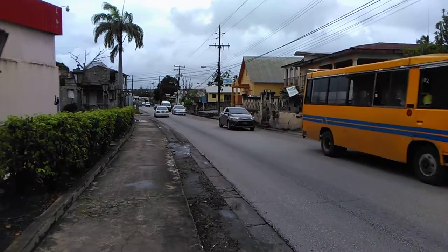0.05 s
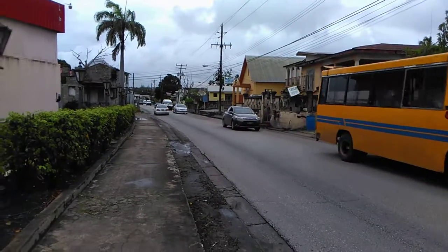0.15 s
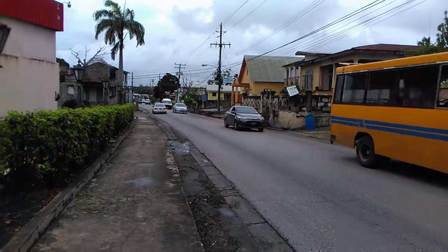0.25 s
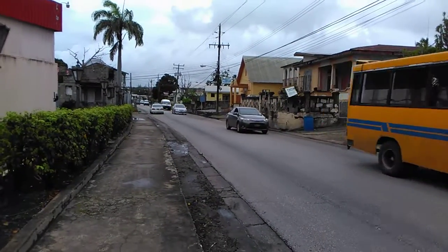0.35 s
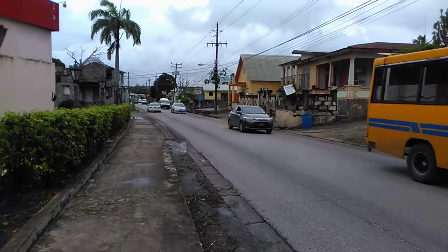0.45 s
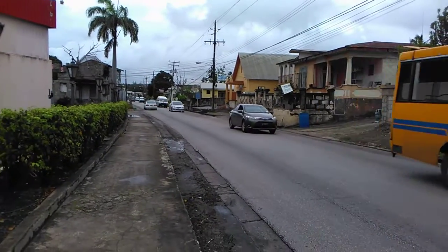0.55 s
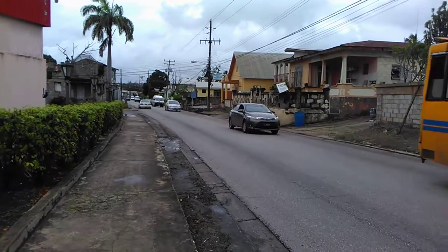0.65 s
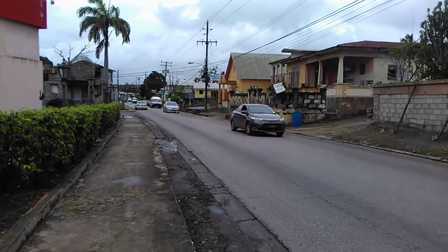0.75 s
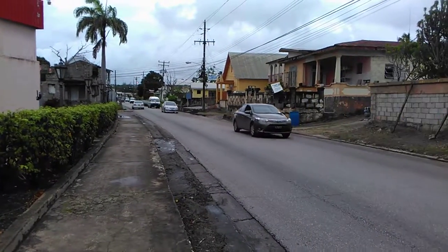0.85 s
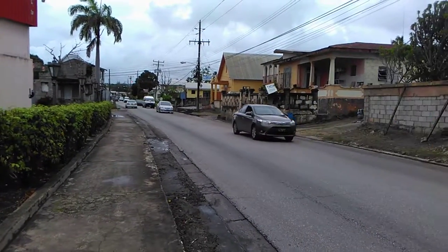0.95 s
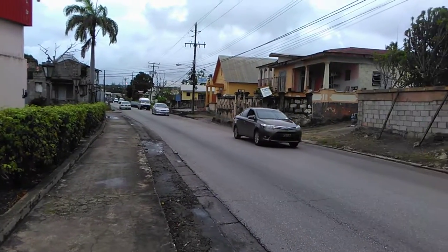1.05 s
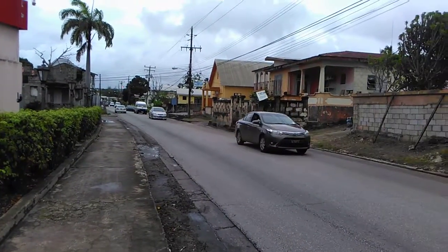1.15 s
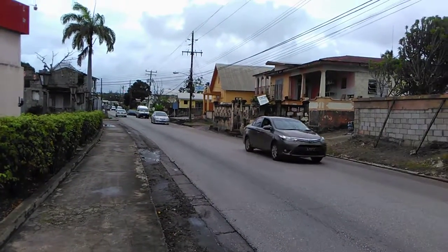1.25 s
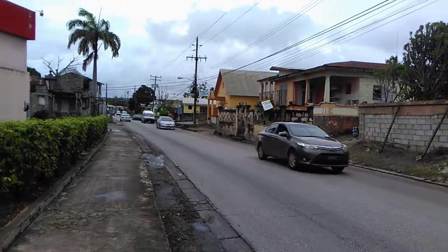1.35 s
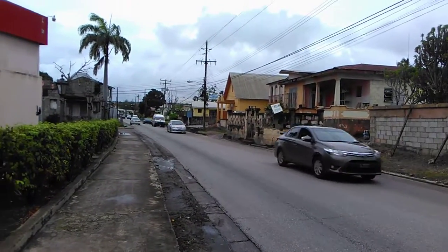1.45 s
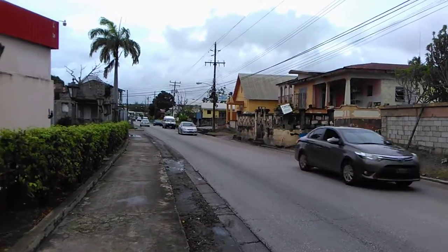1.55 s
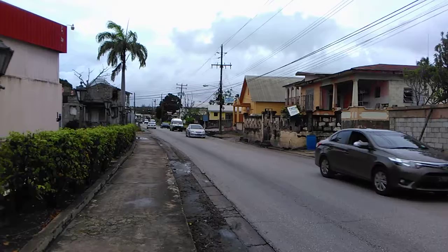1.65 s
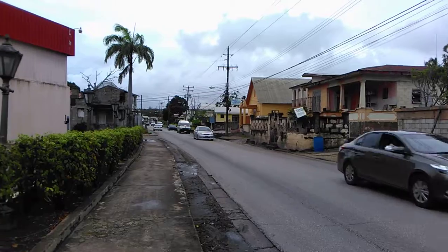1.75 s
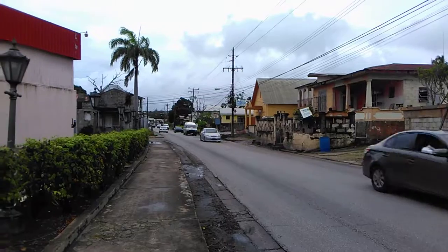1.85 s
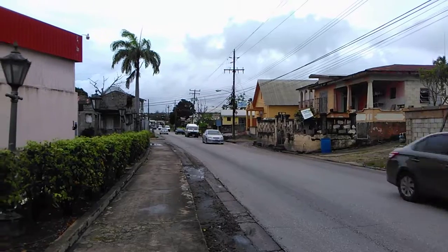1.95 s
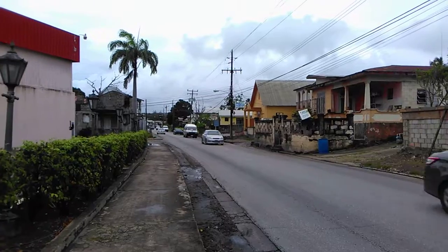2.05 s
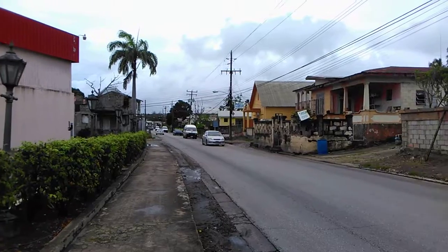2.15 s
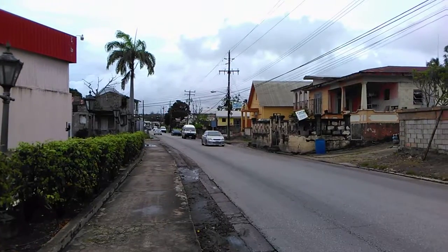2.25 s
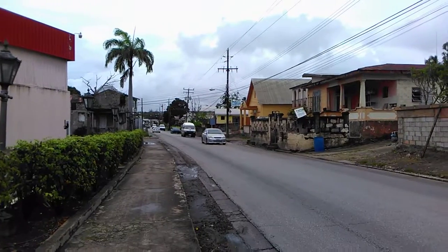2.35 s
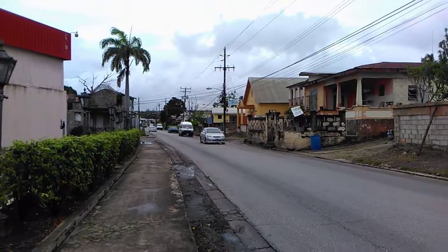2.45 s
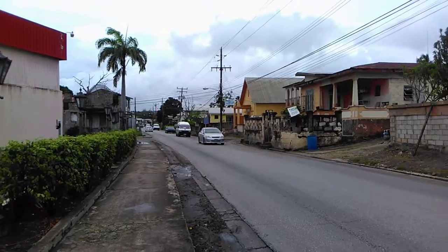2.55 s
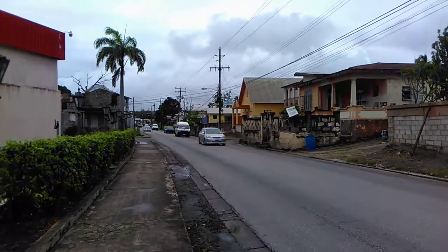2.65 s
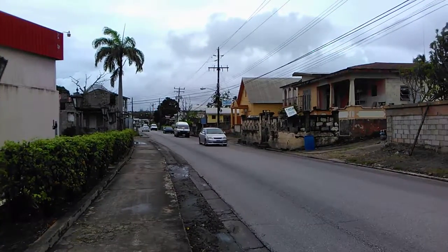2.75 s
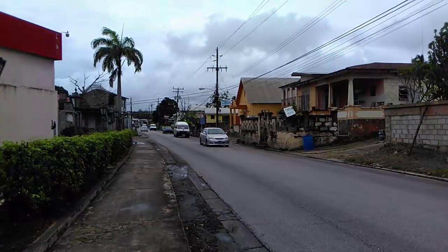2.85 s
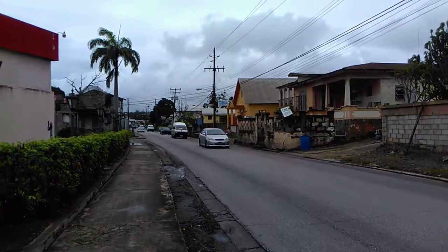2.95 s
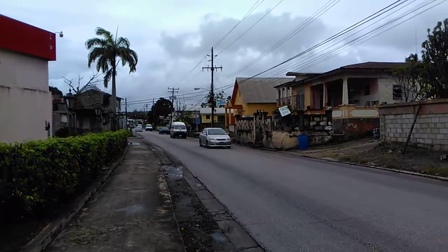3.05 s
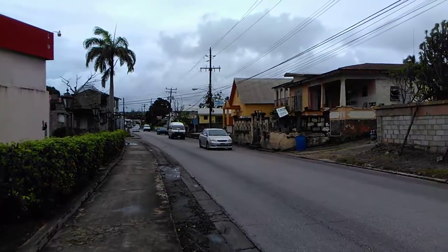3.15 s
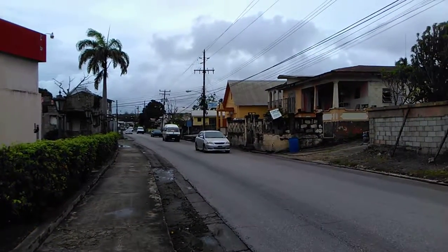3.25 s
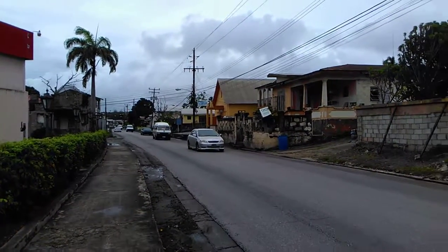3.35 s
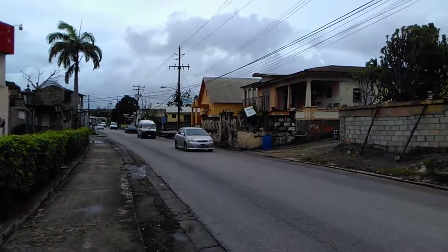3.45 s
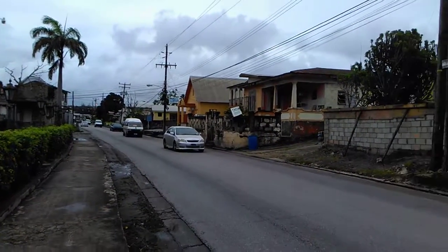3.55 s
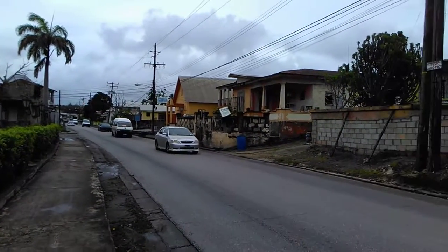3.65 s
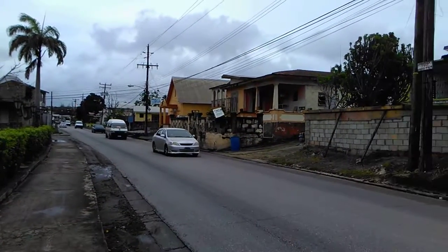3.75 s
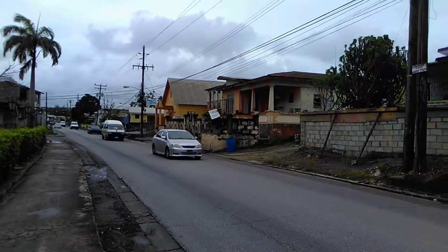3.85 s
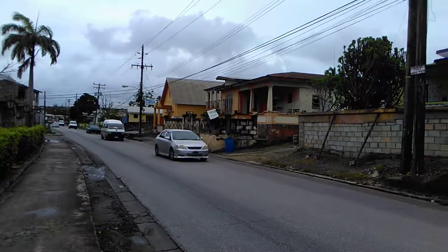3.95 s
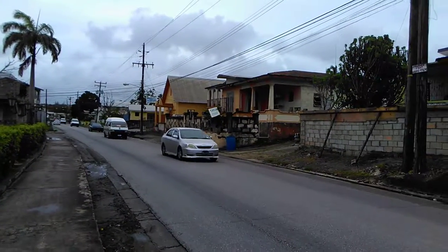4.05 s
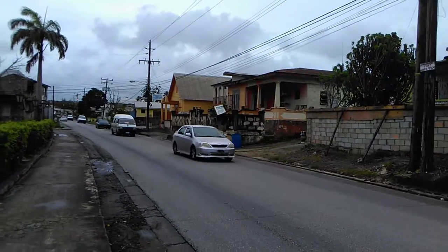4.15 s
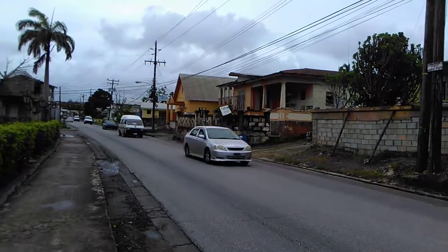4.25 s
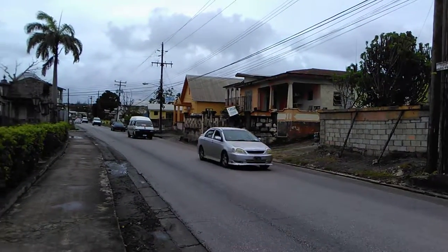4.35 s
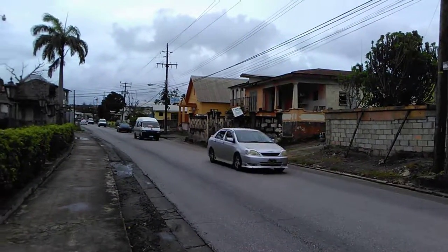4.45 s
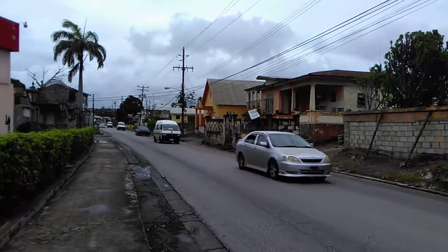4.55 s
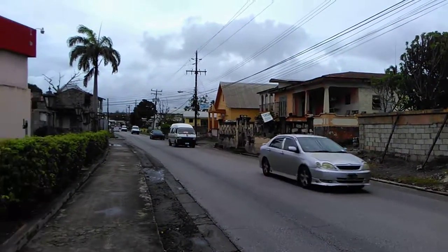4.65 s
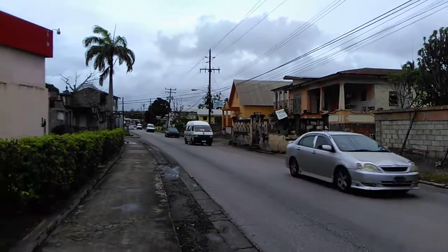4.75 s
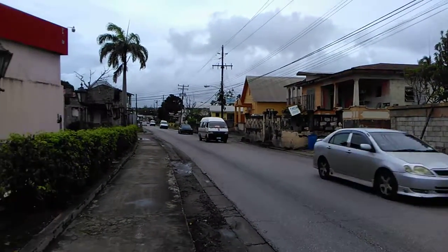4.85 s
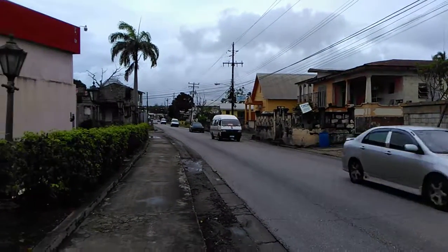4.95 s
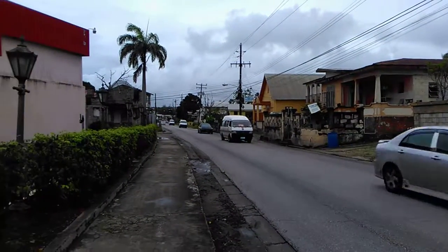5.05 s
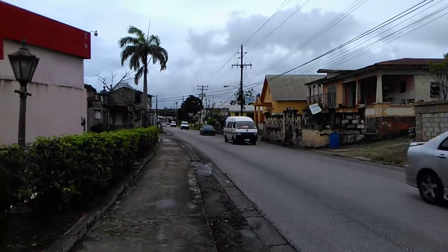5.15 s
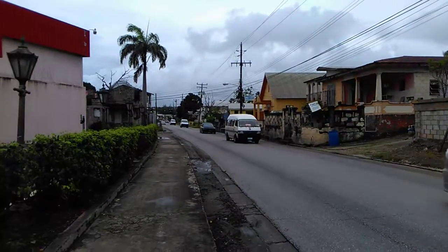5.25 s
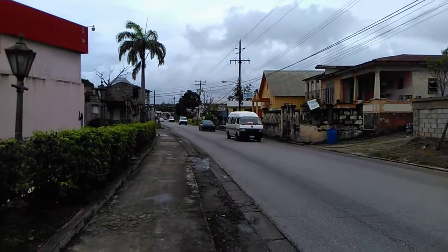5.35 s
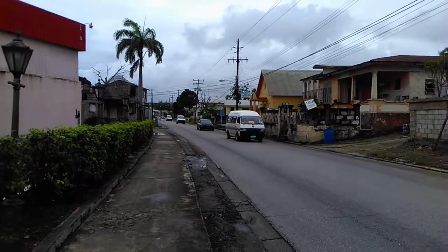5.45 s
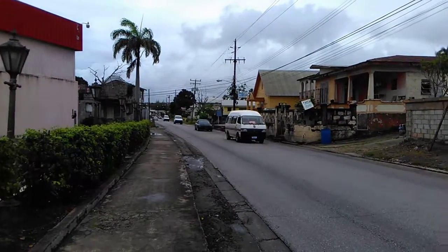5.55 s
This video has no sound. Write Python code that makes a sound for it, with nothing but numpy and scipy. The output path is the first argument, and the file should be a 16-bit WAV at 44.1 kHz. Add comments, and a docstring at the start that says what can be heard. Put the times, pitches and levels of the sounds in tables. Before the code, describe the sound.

Street traffic: a deep, raspy bus exhaust fades into the tyre roar of passing cars before another loud engine booms nearby.

```python
"""Traffic on a residential street, close to a small camera. A diesel bus pulls away with a booming exhaust,
hiss and clatter; tyre roar of cars fills the gap; then a second loud exhaust bursts in close by.
The camera's limiter holds the peaks and its electronics leak a faint high whine."""
import sys
import numpy as np
from scipy import signal
from scipy.io import wavfile
from scipy.ndimage import uniform_filter1d, minimum_filter1d

SR = 44100
rng = np.random.default_rng(int(sys.argv[2]) if len(sys.argv) > 2 else 0)


def generate_wav(signal):
    """Clip the signal to [-1, 1] and save it as 16-bit WAV at the path in sys.argv[1]."""
    frames = np.transpose(np.atleast_2d(signal))
    scaled = np.clip(frames, -1, 1) * 32767
    pcm = np.round(scaled).astype(np.int16)
    wavfile.write(sys.argv[1], SR, pcm)


N = 247842

# exhaust boom, one curve an engine: (s, firing rate Hz, dB of orders 1 to 3)
BUS = [(0, 61.7, -5, -7.5, -15), (.15, 65.06, -7.5, -13.5, -17.5), (.34, 68.03, -7.5, -20, -18.5), (.55, 66.9, -4.5, -19, -25),
       (.68, 67.77, -3.5, -14, -37.5), (.87, 67.72, -6, -14, -28.5), (1.26, 68.22, -8, -21, -51.5), (1.48, 67.23, -12, -19.5, -37),
       (1.53, 66.4, -15.5, -19.5, -39), (1.74, 66, -20, -23, -40), (1.81, 65.5, -42, -35, -48), (1.93, 65.57, -20.5, -32.5, -51),
       (2.09, 64.28, -40.5, -37, -46), (2.8, 63.66, -37, -35, -40.5), (3.2, 63.2, -43.5, -46, -42), (3.33, 63, -29, -29.5, -57), (3.5, 62, -41, -56, -50)]
SECOND = [(4.05, 61.94, -48.5, -35, -39), (4.16, 60.97, -34, -41, -47), (4.205, 61.13, -25, -30, -38), (4.23, 61.74, -8.5, -18, -28),
          (4.3, 61.2, -7.5, -20, -20.5), (4.43, 60.06, -7, -23, -26), (4.53, 62.91, -7, -13, -19.5), (4.6, 65.53, -5, -19, -16.5), (4.72, 61.01, -2.5, -17, -24), (4.82, 61.42, -7, -15, -21), (4.9, 61.02, -9.5, -9.5, -26.5),
          (5.08, 61.88, -8, -10, -21), (5.19, 62.9, -7, -16.5, -33.5), (5.38, 63.65, -4.5, -21.5, -26), (5.53, 64.1, -8, -13.5, -20),
          (5.62, 63.76, -7.5, -14, -38)]
# rasp between the bursts, one row an engine: (dB against order 1, pipe resonance Hz, order 4 against the rasp dB)
RASP = [(-21.5, 368, -4), (-28.5, 480, 0)]
# swells of tyre roar as vehicles come and go: (loudest s, spread s, dB near 1.3 kHz, body lift dB, treble lift dB,
# tread resonance Hz, its height dB)
ROAD = [(.27, 0.15, -29.5, 2, -4, 900, 2.5), (.62, 0.31, -38, -10.5, 7.5, 860, 7.5), (1.15, 0.23, -47.5, -4.5, 2, 860, 17),
        (1.7, 0.34, -38, 0, 1.5, 992, -1.5), (2.5, 0.54, -35, 2, 3, 1060, 5.5), (2.9, 0.084, -44, 14, -2.5, 1080, 9),
        (3.251, 0.31, -39, -2.5, -3, 1055, -0.5), (3.55, 0.22, -41.5, 0.5, -1, 800, 0.5), (3.8, 0.13, -34.5, -6, 1, 916, 17),
        (4.1, 0.25, -39.5, -3.5, 1.5, 900, 6.5), (4.42, 0.22, -42, -0.5, 1.5, 880, 5.5),
        (4.75, .2, -44, 12, 2, 699, 8.5), (5.1, 0.21, -43.5, -5.5, 0.5, 700, 13.5), (5.62, 0.3, -34.5, 0, 2.5, 667, 1.5)]
TYRES = [(88, -47.5), (150, 3), (192, -7.5), (309, -15.5), (363, -3), (428, -8.5), (748, -6.5), (881, -12.5), (1090, -9),
         (1420, -12.5), (1720, -11), (2640, -17), (2960, -19.5), (7540, -42), (9800, -57.5), (16600, -120)]  # (Hz, dB per Hz)
RUMBLE = [(15, -24.5), (30, 9.5), (60, 1.5), (120, 2.5), (220, -5.5), (400, -18), (700, -72.5)]  # (Hz, dB per Hz)
# one table an engine: (s, block clatter dB)
CLATTER = [[(0, -39.5), (.1, -32), (.27, -27.5), (.42, -30), (.61, -36.5), (.63, -44), (.9, -39.5)],
           [(4.4, -54), (4.49, -45), (4.51, -35), (4.55, -41), (4.85, -33), (4.94, -33), (5.08, -29), (5.12, -38), (5.155, -28.5), (5.2, -33), (5.62, -35.5)]]
BLOCKS = [[(2150, 470, -3.5), (2720, 380, -0.5), (3260, 1400, -12.5)],
          [(1350, 160, -1.5), (2065, 170, 0), (2380, 350, -7.5), (2650, 520, -10)]]  # (Hz, width Hz, dB)
# one table an engine: (s, narrow hiss dB, wide hiss dB)
HISS = [[(0, -50, -43), (.256, -39, -35.5), (.86, -41.5, -45), (.9, -41.5, -55), (1.07, -50.5, -65.5), (1.456, -45, -69), (1.65, -64, -63)],
        [(4.85, -62, -68), (4.97, -60, -63), (5.19, -65.5, -71), (5.274, -61.5, -53), (5.62, -73, -47.5)]]
NARROW = [(4750, -43.5), (5050, -4.5), (5700, -4), (6150, -13), (6450, -45), (9200, -37.5), (9600, -26), (14200, -40.5)]  # (Hz, dB per Hz)
# one spectrum an engine: (Hz, dB per Hz)
WIDE = [[(3000, -29.5), (4500, -5), (6500, -1), (8000, -12), (9400, -17), (11000, -38), (14200, -36.5)],
        [(3000, -16.5), (4500, -7), (6000, -4.5), (7200, 0.5), (7700, -6.5), (8200, -24.5), (14200, -37)]]
# bursts of the whine: (s, length s, dB)
WHINE = [(1.012, .17, -65), (4.635, .19, -84), (5.277, .13, -82)]  # further bursts: (s, length s, dB)
WHINE_HZ = 14000
TICKS = [(4.3754, -49), (4.4263, -40), (4.5444, -53), (4.5695, -50), (4.5994, -47), (4.617, -42), (4.8135, -36), (5.1985, -44), (5.2834, -45),
         (5.3878, -40)]  # faint clicks: (s, peak dB)
EDGE_HZ = 14250  # fixed
TIME = np.arange(N) / SR
# one table an engine: (s, share of uneven firings 0-1)
UNEVEN = [[(0, 0.65), (.6, 0.1), (1.15, 0.47), (1.3, 0.97), (1.6, 1.1)], [(4.05, 0.44), (4.7, 0.2), (5.2, 0.1), (5.62, 0.05)]]
PIPES = [[(150, -33), (300, -0.5), (450, -4), (620, -10.5), (900, -23), (1500, -46)],
         [(150, -27), (310, 12.5), (380, -5), (500, 2.5), (700, -4.5), (1000, -8.5), (1300, -46.5)]]  # (Hz, dB)
SELF_NOISE, SELF_DB = [(3000, -28.5), (8000, -5), (11000, -2), (14500, -7)], -71.5  # microphone: (Hz, dB per Hz), dB
LOW = [(0, -17.5), (.27, -26.5), (.45, -28.5), (1.4, -28), (1.58, -30), (2.75, -44), (3.2, -41), (3.33, -37), (3.63, -41), (3.84, -35.5), (4.08, -41),
       (4.23, -23), (5.62, -25.5)]  # low rumble: (s, dB of its lowest octave)
# short knocks from the traffic: (s, peak dB, Hz, t60 s)
KNOCKS = [(2.071, -20.5, 757, 0.082), (2.639, -25, 758, 0.098), (3.26, -18, 119.6, 0.28), (3.331, -21, 109.7, 0.25),
          (3.445, -24, 766, 0.08), (3.83, -13, 45.2, 0.13), (3.9, -22.5, 765, 0.077), (4.085, -18.5, 248, 0.13)]
# the boom dips briefly: (s, half width s, dB of order 1, dB of the orders above)
DIPS = [(4.49, 0.045, -15.5, -3.5), (4.66, .04, -18, 6), (5.6, 0.034, -14, -14)]
# bursts of rasp, one table an engine: (start s, hold s, rise s, fall s, dB, pipe resonance Hz, order 4 against the rasp dB)
BURSTS = [[(.3, 0.062, .25, 0.073, -20, 468, -4.5), (.98, 0.14, .05, .1, -30, 330, 4.5), (1.3, .17, 0.058, 0.042, -18.5, 340, 0.5), (1.6, 0.18, .05, 0.089, -40.5, 447, -5)],
          [(4.33, .01, 0.019, .05, -21.5, 420, -16), (4.553, .13, .006, .015, -16, 594, -0.5), (4.755, .01, .02, .04, -15.5, 520, -16),
           (4.8, .2, 0.035, 0.086, -25, 502, -5.5), (5.35, .02, 0.091, 0.031, -25.5, 580, -2), (5.52, 0.074, 0.1, .01, -19.5, 490, -7)]]
# the whine blips at a steady pace, every sixth blip is long
BLIP_EVERY_S, BLIP_S, BLIP_DB, LONG_S, LONG_DB = .3202, .02, -75, .14, -68
FALL_DB = 10  # a burst of rasp loses this much in each rise or fall time


def amp(db):
    """dB to gain."""
    return 10 ** (np.asarray(db) / 20)


def evened(x):
    """Scales to rms 1."""
    return x / np.sqrt(np.mean(np.abs(x) ** 2) + 1e-20)


def read(points, hz):
    """Spectrum value on a log-frequency axis."""
    f, value = np.transpose(points)
    return np.interp(np.log(hz + 1), np.log(f + 1), value)


def columns(rows, t=TIME):
    """Each column of a curve at times t, and a gate that is open while the curve lasts."""
    s, *cols = np.transpose(rows)
    gate = np.clip(np.minimum(t - s[0] + 1e3 * (s[0] < .01), s[-1] - t + 1e3 * (s[-1] > 5.6)) / .05, 0, 1)  # fixed
    return gate, [np.interp(t, s, c) for c in cols]


def drift(rate):
    """Slow chance of rms 1, changing about rate times a second."""
    steps = rng.standard_normal(1200)
    return np.interp(TIME * np.clip(rate, 1, 200), np.arange(1200), steps) * np.sqrt(3 / 2)


def noise(field_db, patchy_db, flicker_db, size, band=(0, SR)):
    """Random short-time spectra; field_db(hz, t) gives the colour, with patches and wide flicker on top.
    The part inside band has rms 1."""
    hop = size // 4
    frames, hz = N // hop + 5, np.fft.rfftfreq(size, 1 / SR)[:, None]
    a, b, patches = rng.standard_normal((frames, len(hz), 3), dtype=np.float32).T
    flicker = evened(uniform_filter1d(uniform_filter1d(patches[::-1], size // 8, 0), 3, 1))
    patches = evened(uniform_filter1d(uniform_filter1d(patches, size // 100, 0), 3000 // hop, 1))
    colour = amp(field_db(hz, np.arange(frames) * hop / SR))
    colour = colour / np.sqrt((colour ** 2 * (hz >= band[0]) * (hz < band[1])).mean(0))
    z = (a + 1j * b) * colour * amp(patchy_db * patches + flicker_db * flicker)
    return np.sqrt(np.mean(colour ** 2)) * evened(signal.istft(z, nperseg=size, noverlap=size - hop)[1][:N])


def exhaust(rows, steady, bursts, uneven_rows, pipe, wobble_db, rough, jitter):
    """Firing orders as wavering sines; above them a rasp whose half orders come from uneven cylinders."""
    gate, hz, first_db, upper_db = boom_of(rows, TIME)
    rasp_db, pipe_hz, fourth_db = rasp_of(rows, steady, bursts, TIME)
    order_db = [first_db, *upper_db, rasp_db + fourth_db]
    uneven = np.clip(columns(uneven_rows)[1][0], 0, 1)
    turns = np.cumsum(hz * (1 + jitter * drift(30))) / SR
    slide = [0.68 * k * drift(1.98) for k in range(4)]  # echoes slowly shift the upper orders against the first
    far = 0.1 * np.clip(-27 - order_db[0], 0, 20)  # a faint, far engine wavers more
    boom = sum(np.sqrt(2) * amp(db + wobble_db * (1 + 0.43 * k + far) * drift(25)) * np.sin(2 * np.pi * (k + 1) * turns + slide[k])
               for k, db in enumerate(order_db))

    def colour(f, centre_hz):
        return read(pipe, f) + 18.4 * np.exp(-(np.log((f + 1) / centre_hz) / 0.63) ** 2)
    lines, power = 0, 0
    for half in range(9, 36):
        height = (uneven if half % 2 else 1) * amp(colour(half / 2 * hz[::64], pipe_hz[::64])).repeat(64)[:N]
        lines = lines + height * amp(3.3 * drift(12)) * np.cos(2 * np.pi * (half / 2 * turns + 0.21 * rng.standard_normal()))  # nearly in step: one pulse a firing
        power = power + height ** 2
    gas = noise(lambda f, t: colour(f, rasp_of(rows, steady, bursts, t)[1]), 2.5, 0.54, size=1024)
    gas = gas * (1 + .5 * np.cos(2 * np.pi * turns))  # gas leaves in puffs, one a firing
    rough = np.clip(rough, 0, 1)
    rasp = (1 - rough) * evened(lines / np.sqrt(power)) + rough * gas
    return gate * (boom + amp(rasp_db) * rasp), turns


def road():
    """Tyre roar whose body, treble and tread resonance change from car to car, over lumpy low rumble."""
    def colour(hz, t):
        body_db, treble_db, tread_hz, tread_db = swells(t)[1:]
        hump = tread_db * np.exp(-(np.log((hz + 1) / tread_hz) / 0.15) ** 2)
        return read(TYRES, hz) + body_db / (1 + (hz / 650) ** 6) + treble_db / (1 + (2200 / (hz + 1)) ** 4) + hump
    roar = noise(colour, 1.5, 1., size=512, band=(900, 1700))  # fixed
    rumble = noise(lambda f, t: read(RUMBLE, f) + 0 * t, 1.5, 1.5, size=2048, band=(22, 46))  # fixed
    return amp(swells(TIME)[0]) * roar + amp(columns(LOW)[1][0]) * rumble


def clatter(rows, modes, turns, throb):
    """Combustion noise rings the engine block and throbs once a firing."""
    def colour(hz, t):
        power = sum(amp(2 * db) / (1 + (2 * (hz - f) / width) ** 2) ** 2 for f, width, db in modes)
        return 10 * np.log10(power) + 0 * t
    gate, (db,) = columns(rows)
    beat = 1 + throb * np.cos(2 * np.pi * turns)
    return gate * amp(db + 0.9 * drift(14)) * beat * noise(colour, 2.4, 1, size=512)


def hiss():
    """Hiss while each engine is near: a sharp-edged narrow band and a wide one."""
    narrow = noise(lambda f, t: read(NARROW, f) + 0 * t, 0.95, 2.5, size=512)
    wide = noise(lambda f, t: np.where(t < 3, read(WIDE[0], f), read(WIDE[1], f)), 3.3, 0.73, size=256)
    out = 0
    for rows in HISS:
        gate, (narrow_db, wide_db) = columns(rows)
        out = out + gate * (amp(narrow_db) * narrow + amp(wide_db) * wide)
    return out


def ticks(turns):
    """Tiny treble clicks: a faint one at each firing of the second engine, and a few broad ones."""
    out, t = np.zeros(N + 200), np.arange(200) / SR
    ring = np.sin(2 * np.pi * 12000 * t)
    for (s, db), grain in zip(TICKS, rng.standard_normal((len(TICKS), 201))):
        out[round(s * SR):][:200] += amp(db - 60 * t / .0025) * (0.55 * np.diff(grain) + .4 * ring)
    fired = np.diff(np.floor(turns), prepend=0) * (TIME > 4.3) * (TIME < 5.5)
    faint = fired * amp(-69 + 4.5 * rng.standard_normal(N))
    return out[:N] + signal.oaconvolve(faint, np.hanning(200) * ring)[:N]


def knocks():
    """Each knock swells in a few cycles and rings out on one mode."""
    out, t = np.zeros(N + 9000), np.arange(9000) / SR
    for s, db, hz, t60 in KNOCKS:
        out[round(s * SR):][:9000] += amp(db - 60 * t / t60) * (1 - np.exp(-t * hz / 2)) * np.sin(2 * np.pi * hz * t)
    return out[:N]


def blend(level_db, *controls):
    """Overlapping sounds: their summed level, and each control averaged by power."""
    power = amp(2 * np.array(level_db))
    total = power.sum(0)
    return [10 * np.log10(total)] + [(power * np.array(c)[:, None]).sum(0) / total for c in controls]


def boom_of(rows, t):
    """Gate, firing rate and order levels, with the brief dips."""
    gate, (hz, first_db, *upper_db) = columns(rows, t)
    for s, width, low_db, high_db in DIPS:
        dip = np.clip(1 - abs(t - s) / width, 0, 1)
        first_db, upper_db = first_db + low_db * dip, [db + high_db * dip for db in upper_db]
    return gate, hz, first_db, upper_db


def rasp_of(rows, steady, bursts, t):
    """Level, pipe resonance and order-4 share of the rasp: it follows the boom and flares in bursts."""
    levels = [boom_of(rows, t)[2] + steady[0]]
    levels += [db - FALL_DB * np.maximum(np.maximum((s - t) / rise, (t - s - hold) / fall), 0).clip(0, 20)
               for s, hold, rise, fall, db, *_ in bursts]
    return blend(levels, *np.transpose([steady[1:]] + [row[5:] for row in bursts]))


def swells(t):
    """Each swell of tyre roar fades with distance on both sides of its loudest moment."""
    s, spread, db, *colours = np.transpose(ROAD)
    return blend(db[:, None] - 10 * np.log10(1 + ((t - s[:, None]) / spread[:, None]) ** 2) * 2, *colours)


def scene():
    """Both engines over the road noise."""
    bus, bus_turns = exhaust(BUS, RASP[0], BURSTS[0], UNEVEN[0], PIPES[0], wobble_db=0.67, rough=0.48, jitter=0.0052)
    second, second_turns = exhaust(SECOND, RASP[1], BURSTS[1], UNEVEN[1], PIPES[1], wobble_db=1.57, rough=0.4, jitter=0.005)
    blocks = clatter(CLATTER[0], BLOCKS[0], bus_turns, 0.058) + clatter(CLATTER[1], BLOCKS[1], second_turns, 0.15)
    return (bus + second + blocks + road() + hiss() + knocks() + ticks(second_turns))[None]


def record(dry):
    """A peak limiter, the whine and the gain-controlled hiss of the electronics, then the band limit."""
    room = np.minimum(.8 / (abs(dry) + 1e-9), 1)  # fixed
    held = dry * uniform_filter1d(minimum_filter1d(room, 661, axis=1), 661, axis=1)  # fixed
    blips = [(k * BLIP_EVERY_S, *((BLIP_S, BLIP_DB) if k % 6 else (LONG_S, LONG_DB))) for k in range(15)]  # fixed
    on = sum(amp(db) * np.clip(np.minimum(TIME - s, s + length - TIME) / .003, 0, 1) for s, length, db in blips + WHINE)
    held = held + on * np.sin(2 * np.pi * WHINE_HZ * TIME)
    loud_db = 10 * np.log10(abs(uniform_filter1d(dry ** 2, 4410, axis=1)) + 1e-12)  # fixed
    duck_db = .2 * np.maximum(loud_db + 21.5, 0)  # the gain drops under loud sound, and the hiss with it
    held = held + amp(SELF_DB - duck_db) * noise(lambda f, t: read(SELF_NOISE, f) + 0 * t, .6, .6, size=256)
    return signal.oaconvolve(held, signal.firwin(511, EDGE_HZ, window=("kaiser", 9), fs=SR)[None], "same")


dry = scene()
out = record(dry)
generate_wav(out)
```